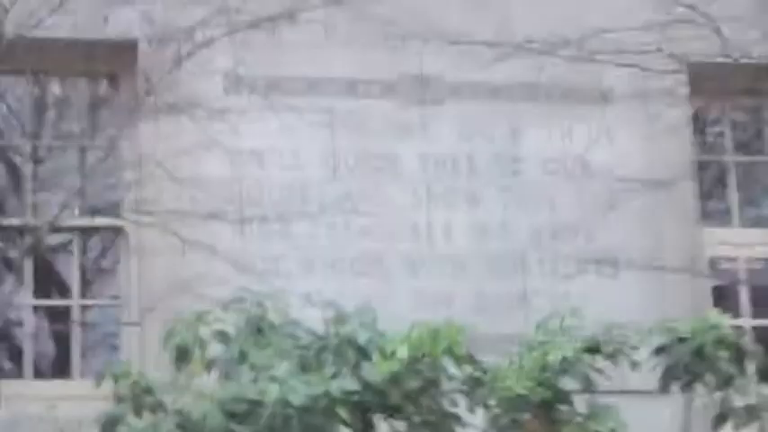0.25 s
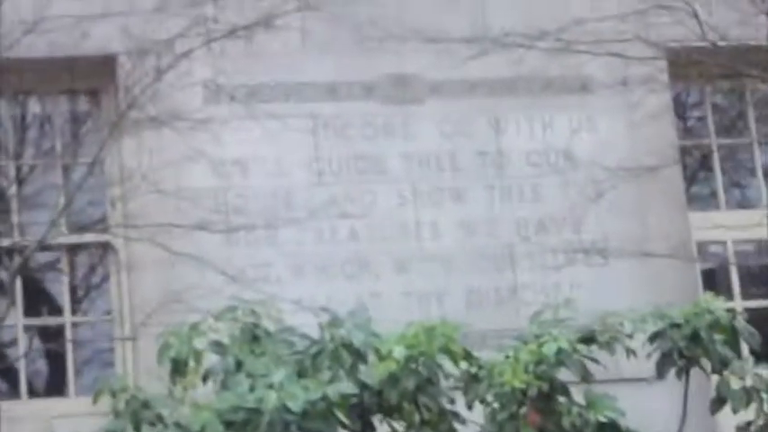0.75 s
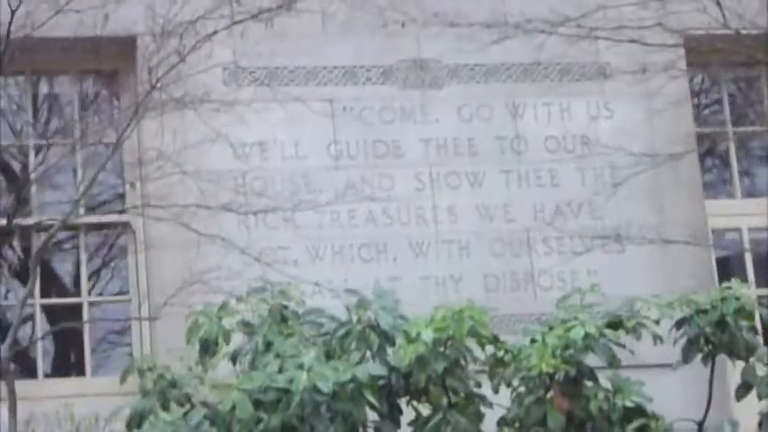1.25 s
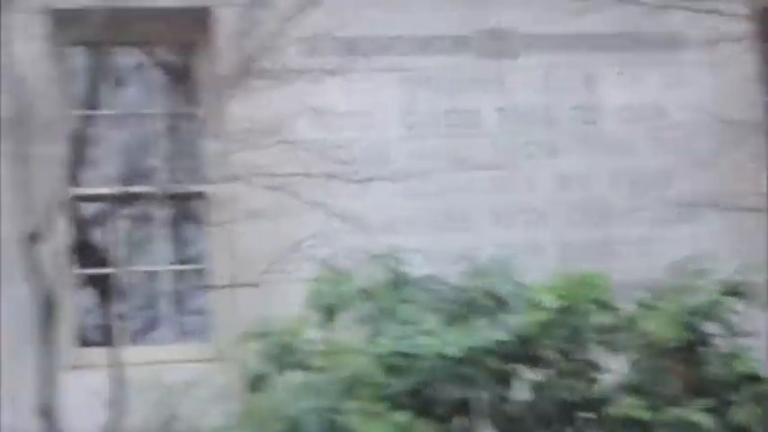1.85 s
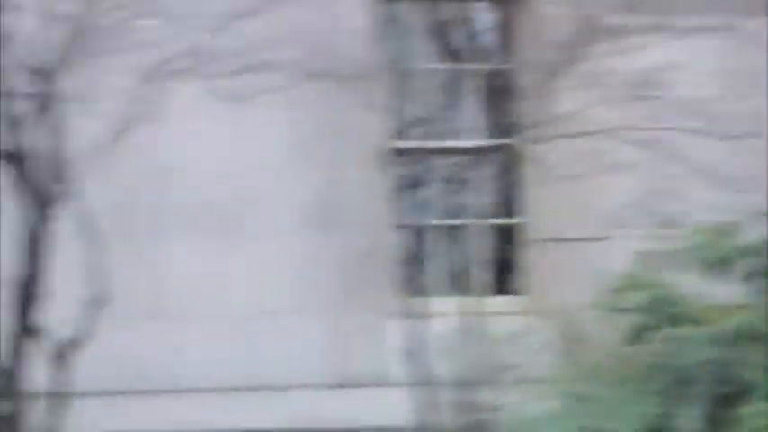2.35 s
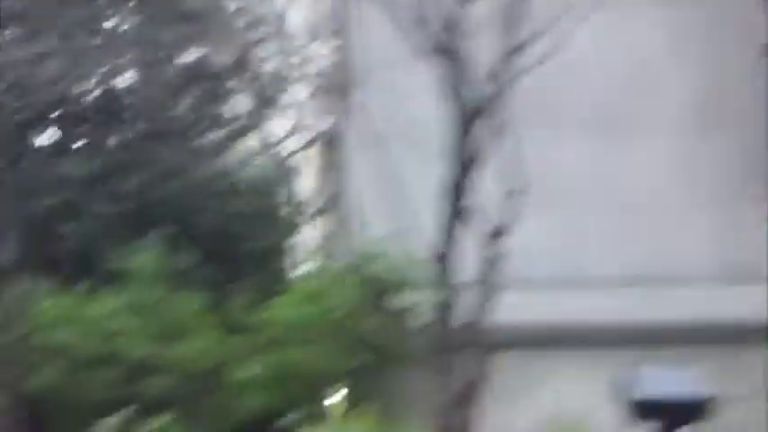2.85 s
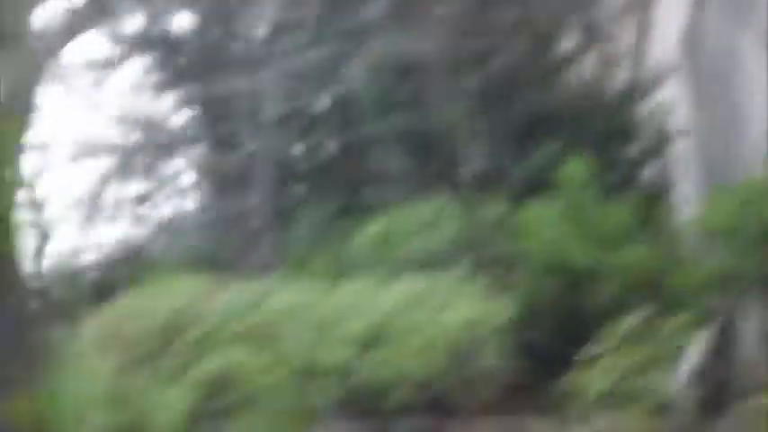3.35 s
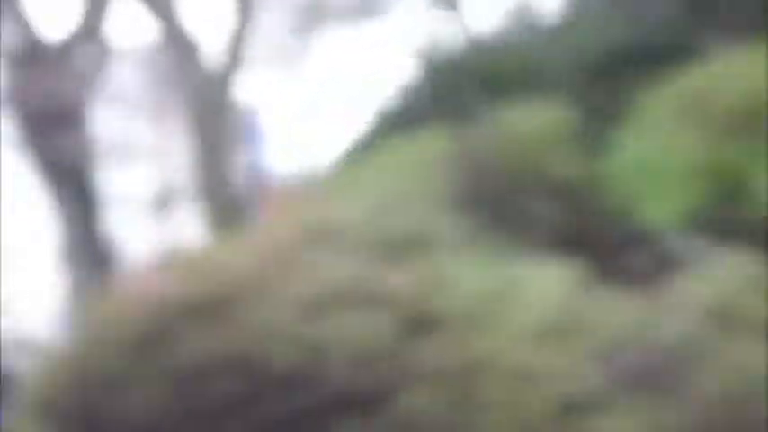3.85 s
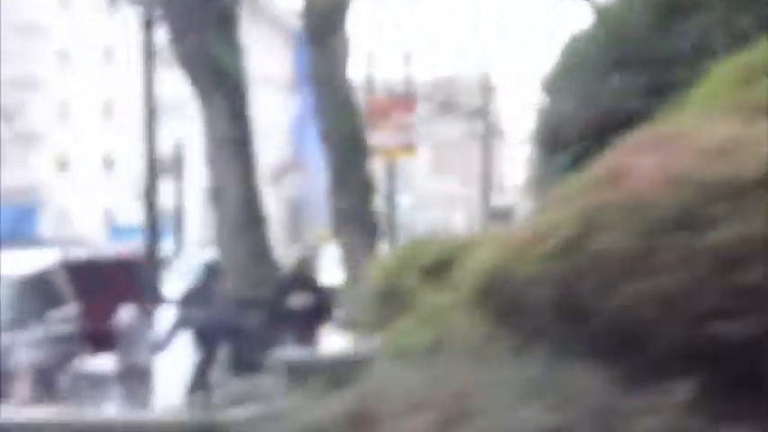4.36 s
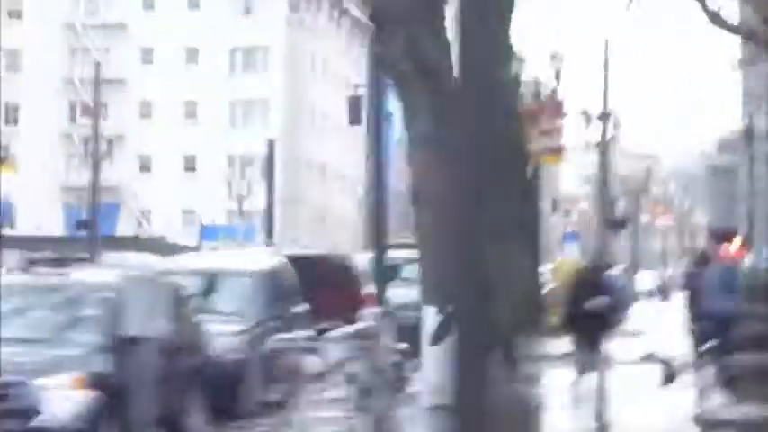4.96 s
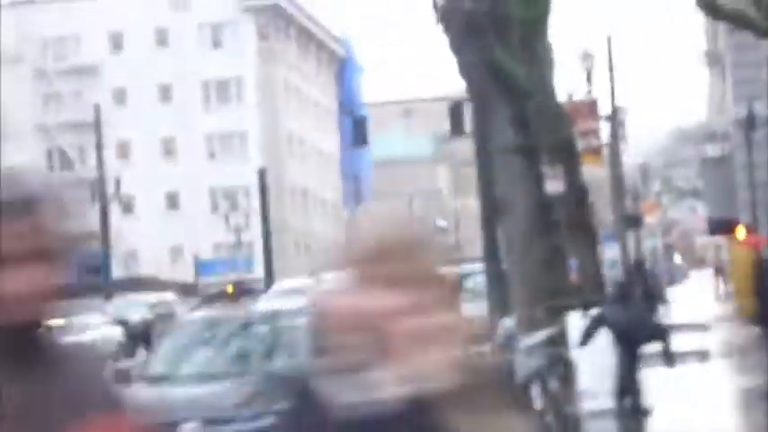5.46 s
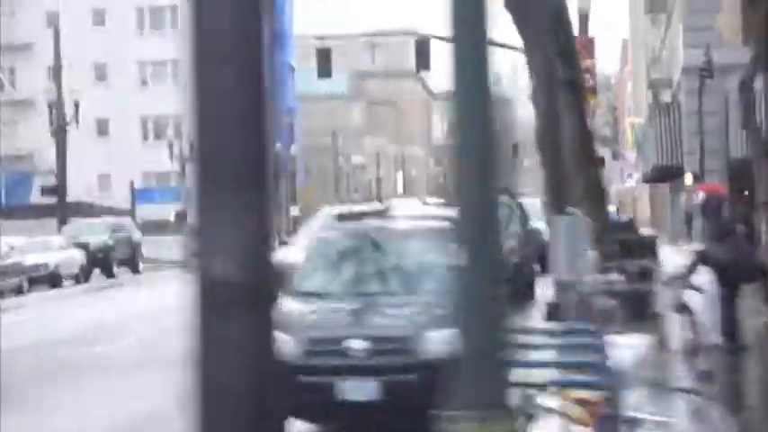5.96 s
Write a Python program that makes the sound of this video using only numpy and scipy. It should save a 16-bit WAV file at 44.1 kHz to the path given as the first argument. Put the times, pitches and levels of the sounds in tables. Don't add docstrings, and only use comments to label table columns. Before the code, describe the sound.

On a wet city street, a heavy engine idles quietly close by, then within about a second pulls away, its low uneven hum rising in pitch. Tyre rumble, roar and spray grow steadily thicker. A dull hollow knock returns at even intervals, fading each time, among small scuffs, sharp ticks and late water spatter. A small, slightly muffled microphone fades in at the start.

```python
import sys
import numpy as np
from scipy import signal
from scipy.fft import rfft, irfft, next_fast_len
from scipy.io import wavfile
from scipy.ndimage import uniform_filter1d, map_coordinates

SR = 44100
rng = np.random.default_rng(int(sys.argv[2]) if len(sys.argv) > 2 else 0)


def generate_wav(sig):
    pcm = np.round(np.clip(np.atleast_2d(sig).T, -1, 1) * 32767).astype(np.int16)
    wavfile.write(sys.argv[1], SR, pcm)


def gain_from_db(level_db):
    decades = np.asarray(level_db, float) / 20
    return 10 ** decades


N = 274302

# (time [s], firing rate [Hz], load [dB])
ENGINE_RUN = [(.35, 35.57, -22.5), (1.0, 35.64, -13), (1.2, 43.72, -4), (1.4, 57.53, -5.5), (1.6, 64.6, -2),
              (1.85, 67.15, -4), (2.4, 62.8, -2.5), (2.85, 67.3, -2.5), (3.05, 72.9, -3.5), (3.3, 74.5, 0),
              (3.75, 79.05, 1), (4.05, 76.33, -2), (4.2, 73.3, -6), (4.5, 74.3, -8.5), (4.85, 72.92, -11),
              (5.3, 80.46, -8), (5.6, 80.3, -6.5), (6.1, 82, -5.5)]


def unit(x):
    return x / np.sqrt(np.mean(x ** 2) + 1e-20)


def along(points, hz):
    f, v = np.transpose(points)
    return np.interp(np.log(hz + 1), np.log(f + 1), v)


def curves(rows):
    s, *cols = np.transpose(rows)
    return [np.interp(np.arange(N) / SR, s, c) for c in cols]


def wobble(rate):
    knots = rng.standard_normal(int(N * 40 / SR) + 4)
    return map_coordinates(knots, [np.arange(N) * min(rate, 40) / SR])


def filtered(x, response):
    m = next_fast_len(len(x) + SR // 2)
    return irfft(rfft(x, m) * response(np.fft.rfftfreq(m, 1 / SR)), m)[:len(x)]


def coloured(x, spectrum):
    return filtered(x, lambda hz: gain_from_db(along(spectrum, hz)))


def rush(spectrum, patchy_db):
    z = signal.stft(rng.standard_normal(N), nperseg=512)[2]
    patches = uniform_filter1d(rng.standard_normal(z.shape), size=6, axis=0)
    patches = uniform_filter1d(patches, size=10, axis=1)
    x = signal.istft(z * gain_from_db(patchy_db * unit(patches)), nperseg=512)[1][:N]
    return unit(coloured(x, spectrum))


def tone(turns, db, flutter_db, drift):
    phase = 2 * np.pi * (turns + rng.random()) + drift * wobble(9)
    return np.sqrt(2) * gain_from_db(db + flutter_db * wobble(11)) * np.sin(phase)


def add(track, s, sound):
    part = track[round(s * SR):][:len(sound)]
    part += sound[:len(part)]


def fading():
    return 1.53 * wobble(5)


def fan(firing_hz):
    # (firing rate [Hz], blade rate [Hz], level [dB])
    blade_rows = [(35.99, 144.2, -46), (49.05, 161, -48.5), (60.16, 171, -44.5), (65.5, 184, -37),
                  (74, 203.5, -38), (82, 222, -37.5)]
    at_hz, *blade = np.transpose(blade_rows)
    blade_hz, blade_db = (np.interp(firing_hz, at_hz, c) for c in blade)
    return tone(np.cumsum(blade_hz) / SR, blade_db + fading(), flutter_db=1.2, drift=.15)


def engine():
    # (order, idle level [dB], level at full load [dB], share of load felt)
    strong_orders = [(5, -66.5, -32.5, 0.77), (8, -52, -29, 1.36), (11, -47, -41, 0.77),
                     (16, -59.5, -30.5, 1.05)]
    # (order, idle level [dB], pulling level [dB])
    weak_orders = [(7, -63, -50), (9, -69, -53), (13, -47.5, -58), (14, -50.5, -61), (18, -63, -51),
                   (19, -57, -48.5), (21, -56.5, -53), (24, -61.5, -53), (27, -54, -55.5)]
    # (frequency [Hz], level [dB])
    exhaust = [(22, -25.5), (40, -12.5), (49, 0.5), (63, 2.5), (78, -5.5), (130, -4.5), (146, -1.5),
               (155, 3)]
    firing_hz, load_db = curves(ENGINE_RUN)
    cycle = np.cumsum(firing_hz) / SR / 8
    pulling = np.clip((firing_hz - 38) / 14, 0, 1)
    hum = 0
    for order, idle_db, full_db, share in strong_orders:
        pull_db = full_db + share * load_db + along(exhaust, order * firing_hz / 8)
        level_db = idle_db + np.sqrt(pulling) * (pull_db - idle_db) + fading()
        hum = hum + tone(order * cycle, level_db, flutter_db=.6, drift=.08)
    for order, idle_db, pull_db in weak_orders:
        level_db = idle_db + pulling * (pull_db - idle_db) + 2.5 * wobble(1.5)
        hum = hum + tone(order * cycle, level_db, flutter_db=2.5, drift=.6)
    blades = fan(firing_hz)
    gate = (.5 + .5 * np.sin(2 * np.pi * cycle * 8)) ** 3
    burning = rush([(200, -5.0), (450, 2.5), (1500, -9.0), (4000, -23.5)], patchy_db=2.5)
    throb = gain_from_db(-56 + 5.9 * pulling) * unit(gate * burning)
    return hum + blades + throb


def street():
    # (time [s], nearness of the traffic [dB])
    nearness = [(.3, -1), (.5, -1.5), (1.25, -1), (1.67, 2), (2.2, 3), (2.7, 3.5), (3.0, 5.5), (3.37, 8),
                (3.7, 9), (4.22, 8), (4.7, 9.5), (5.3, 9), (6.22, 9.5)]
    # (frequency [Hz], level per Hz [dB])
    rumble_colour = [(18, -30.5), (30, -6), (50, -10), (100, 4), (200, 4.5), (270, -2.5), (340, 0),
                     (390, -5.5), (480, -7.5), (600, -4.5), (900, -10), (2000, -43)]
    # (frequency [Hz], level per Hz [dB])
    roar_colour = [(150, -18), (400, -1.5), (700, -6), (1200, -2.5), (2000, -6), (3500, -11.5),
                   (7000, -37.5)]
    # (frequency [Hz], level per Hz [dB])
    spray_colour = [(500, -29.5), (1500, -5.5), (2400, -2.5), (3200, 3), (4200, -1), (5200, -1.5),
                    (6300, -2.5), (8000, -9.5)]
    near_db, = curves(nearness)
    load_db = curves(ENGINE_RUN)[1]
    t = np.arange(N) / SR
    puddle_db = 4.5 * np.exp(-((t - 5.16) / .54) ** 2)
    rumble_db = -44 + .22 * near_db + .29 * load_db
    roar_db = -51 + near_db
    spray_db = -53.5 + near_db + puddle_db
    swell = wobble(6.1)
    lumps = gain_from_db(.6 * wobble(6))
    rumble = gain_from_db(rumble_db + 5) * lumps * rush(rumble_colour, patchy_db=1)
    roar = gain_from_db(roar_db + 1.5 + .31 * swell + .23 * wobble(19)) * rush(roar_colour, patchy_db=1.44)
    spray = gain_from_db(spray_db + .3 + .47 * swell + .17 * wobble(23)) * rush(spray_colour, patchy_db=1.35)
    landing = rng.random(N) < 260 / SR
    drops = landing * gain_from_db(4.5 * rng.standard_normal(N)) * rng.choice([-1, 1], N)
    splash = rng.standard_normal(132) * gain_from_db(-40 * np.arange(132) / 132)
    drops = signal.fftconvolve(drops, splash)[:N]
    drops = gain_from_db(spray_db - 8) * unit(coloured(drops, spray_colour))
    gust_db = -49 - ((t - 5.75) / .11) ** 2
    gust = gain_from_db(gust_db) * rush([(12, -22), (22, 3), (30, 3.5), (42, -32.0)], patchy_db=1.5)
    return gust + rumble + roar + spray + drops


def clicks():
    # (time [s], peak [dB], ring [Hz], crack [dB])
    scuffs = [(.525, -38, 2140, 4.5), (.529, -29, 622, -13.5), (.541, -38, 1820, -5),
              (.695, -37.5, 1950, -6.5), (.698, -32.5, 910, -13.5), (.867, -34, 780, -11.5),
              (.870, -29, 2220, -6.5), (.99, -51, 1480, -10), (1.045, -42, 615, -18),
              (1.558, -40, 2930, -4), (3.09, -37.5, 648, -12), (3.717, -29, 1205, -10),
              (4.535, -27.5, 730, -19), (4.723, -31.5, 1071, -19), (4.76, -27.5, 1482, -10),
              (4.815, -29, 2170, -8.5)]
    # (time [s], peak [dB], ring [Hz], crack [dB])
    ticks = [(2.2618, -16.5, 2976, -6), (2.2618, -32, 6640, -1.5), (2.263, -27, 566.1, -15),
             (2.265, -24.5, 4764, 0), (2.267, -34, 3050, 0), (2.422, -37, 3220, -18),
             (2.641, -35.5, 2240, 5.5), (3.247, -28, 2348, -2.5), (3.42, -30, 2670, -9),
             (4.888, -22, 4110, -0.5), (5.27, -23, 3520, -5.5), (5.435, -26, 3150, -12.5)]
    # (frequency [Hz], time [s])
    ring_t60 = [(600, 0.056), (2000, 0.023), (4500, 0.014)]
    crack_colour = [(400, -10.0), (1200, 4), (3000, 3.0), (5000, -2.0), (8000, -4)]
    dull_colour = [(250, -30.0), (600, 4), (1200, -5), (2500, -15.5), (6000, -29.5)]
    out, t = np.zeros(N), np.arange(SR // 8) / SR
    rows = [(*r, -.5, 1) for r in scuffs] + [(*r, -17.5, .8) for r in ticks]
    for s, db, hz, crack_db, scrape_db, shorter in rows:
        t60 = shorter * along(ring_t60, hz)
        fall = gain_from_db(-60 * t / max(t60, .005)) * (1 - np.exp(-t / .0007))
        crack, dull, shake = rng.standard_normal((3, len(t)))
        shake = unit(uniform_filter1d(shake, size=40))
        ring = np.sin(2 * np.pi * hz * t + .45 * shake)
        crack = gain_from_db(crack_db + 5 - 60 * t / .036) * unit(coloured(crack, crack_colour))
        scrape = gain_from_db(scrape_db - 60 * t / .13) * (1 - np.exp(-t / .001))
        scrape = scrape * unit(coloured(dull, dull_colour))
        add(out, s, gain_from_db(db) * (fall * (ring + crack) + .5 * scrape))
    return out


def knocks():
    # (time [s], peak [dB], edge noise [dB])
    hits = [
        (.5957, -20.5, -14),
        (1.983, -23, -20),
        (3.3715, -24, -20),
        (4.7555, -27, -10),
        (6.1425, -30, -16),
    ]
    # (frequency [Hz], level [dB], time to fall 60 dB [s])
    panel = [(175, -3, .07), (265, -4, .065), (305, -2, .07), (436, 0, .06), (560, -14, .04)]
    out, t = np.zeros(N), np.arange(SR // 5) / SR
    late = np.maximum(t - .005, 0)
    for s, db, edge_db in hits:
        ring = 0
        for k, (hz, level, t60) in enumerate(panel[::-1], 1):
            size = gain_from_db(level + rng.normal(0, .8) - 60 * late / t60)
            ring = ring + size * (-1) ** k * np.sin(2 * np.pi * hz * late)
        ring = .85 * ring * (1 - np.exp(-late / .0015))
        u = (t - .002) / .00045
        push = 1.65 * u * np.exp(-u * u / 2)
        note = np.sin(2 * np.pi * 1150 * np.maximum(t - .001, 0))
        push = push + .47 * gain_from_db(-60 * t / .015) * note
        edge = unit(uniform_filter1d(rng.standard_normal(len(t)), size=18))
        edge = gain_from_db(edge_db - 60 * t / .02) * edge
        add(out, s - .002, gain_from_db(db) * (ring + push + edge))
    return out


def spatter():
    # (time [s], peak [dB], length [s])
    bursts = [(4.071, -28, .002), (4.082, -29, .002), (4.09, -32, .002), (4.12, -26, .0015),
              (4.128, -27, .0015), (4.1365, -26, .002), (4.147, -27, .0015), (4.156, -27, .0015),
              (4.46, -31, .003), (4.583, -30, .003), (4.694, -29, .005), (4.73, -31, .002),
              (4.948, -29, .003), (5.17, -31, .002), (5.31, -31, .004), (5.47, -31, .002),
              (5.695, -31, .004), (5.855, -29, .004), (6.016, -28, .004), (6.03, -30, .005)]
    colour = [(1000, -22.0), (2500, -10), (4500, -10.5), (6500, -9.0), (7400, -15.5)]
    out, t = np.zeros(N), np.arange(SR // 16) / SR
    for s, db, length in bursts:
        u = t / np.clip(length, .001, .006)
        puff = u ** .38 * np.exp(-u) * coloured(rng.standard_normal(len(t)), colour)
        add(out, s, gain_from_db(db + 4.0) * puff / np.abs(puff).max())
    return out


def walls(x):
    # (frequency [Hz], time [s])
    echo_t60 = [(200, 0.092), (1000, 0.16), (3000, 0.052), (7000, 0.043)]
    hz, t, z = signal.stft(rng.standard_normal(SR // 2), SR, nperseg=256)
    fall = gain_from_db(-60 * t / along(echo_t60, hz)[:, None])
    tail = signal.istft(z * fall, SR, nperseg=256)[1]
    late = np.pad(x, (350, 0))
    return signal.fftconvolve(late, tail / np.linalg.norm(tail))[:N]


def scene():
    hits = knocks() + clicks() + spatter()
    return (engine() + street() + hits + gain_from_db(-13) * walls(hits))[None]


def top_cut(x):
    return signal.sosfilt(signal.butter(12, 7580, fs=SR, output="sos"), x)


def record(dry):
    # (frequency [Hz], level [dB])
    highs_lost = [(6500, -0.5), (6900, -6), (7250, -12.5), (7500, -23), (7680, -38), (7800, -70)]
    dip_hz, wide_hz, left = 5420, 520, .04

    def microphone(f):
        off = dip_hz ** 2 - f * f
        dip = (off + 1j * f * wide_hz * left) / (off + 1j * f * wide_hz)
        return dip * gain_from_db(along(highs_lost, f))

    x = filtered(dry[0], microphone)
    fade = np.clip((np.arange(N) / SR - .1) / .24, 0, 1) ** 1.08
    return top_cut((x * fade)[None])


dry = scene()
out = record(dry)
generate_wav(out)
```